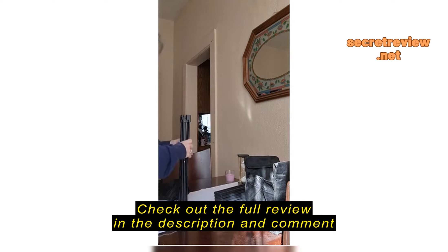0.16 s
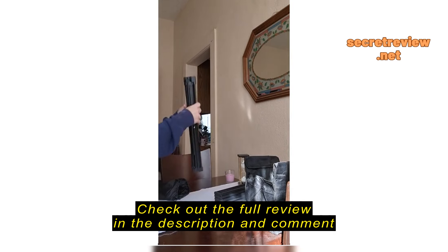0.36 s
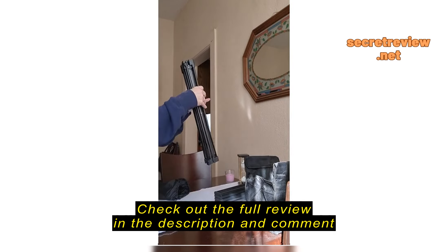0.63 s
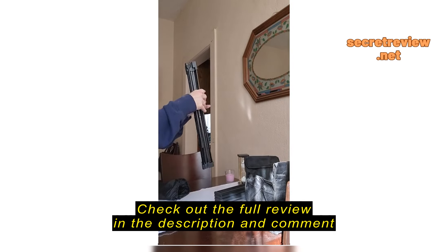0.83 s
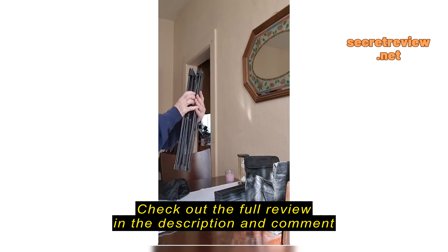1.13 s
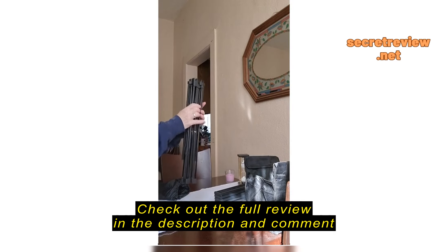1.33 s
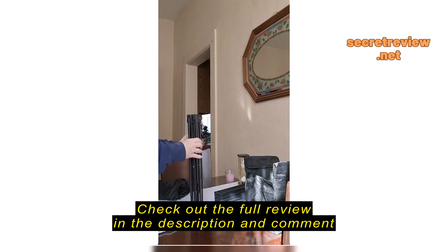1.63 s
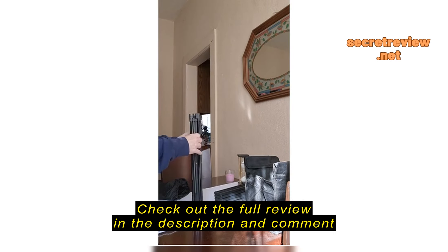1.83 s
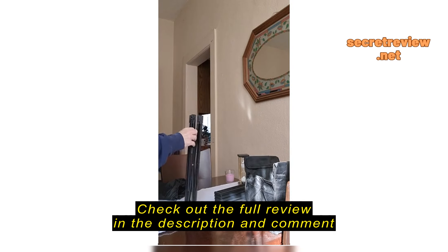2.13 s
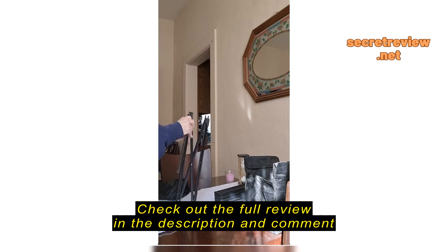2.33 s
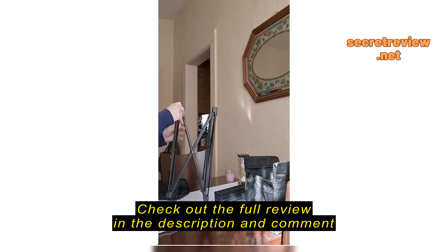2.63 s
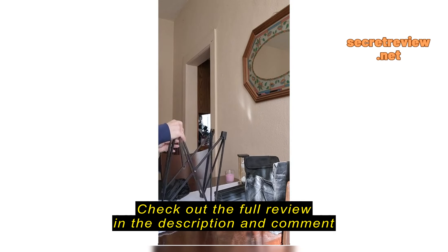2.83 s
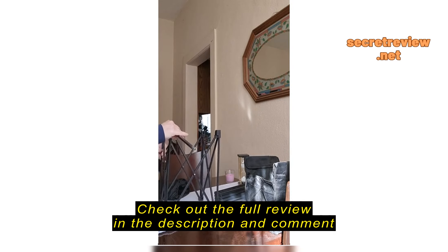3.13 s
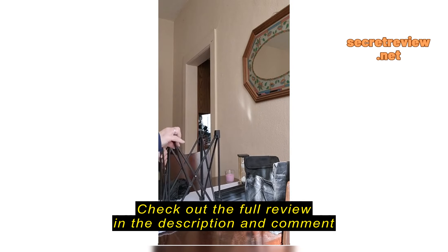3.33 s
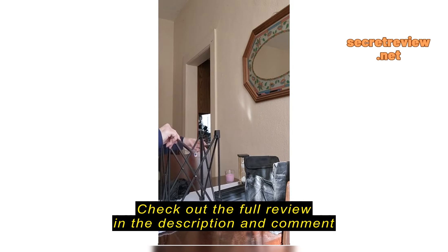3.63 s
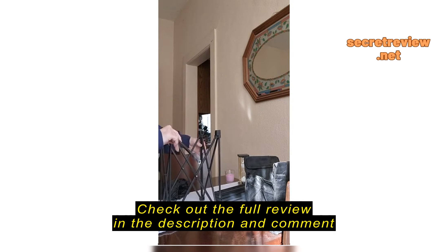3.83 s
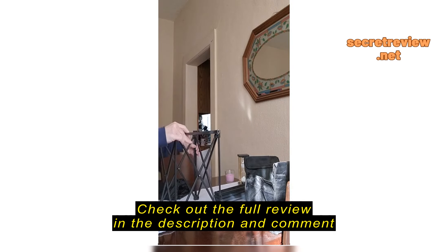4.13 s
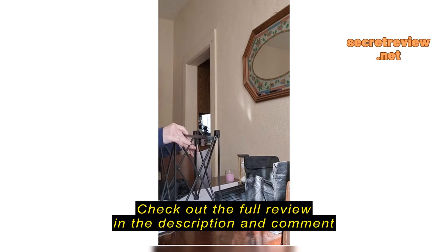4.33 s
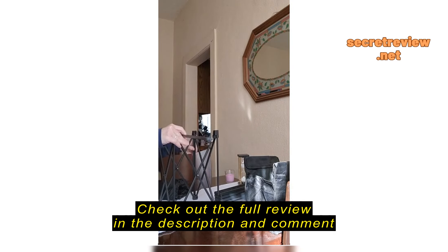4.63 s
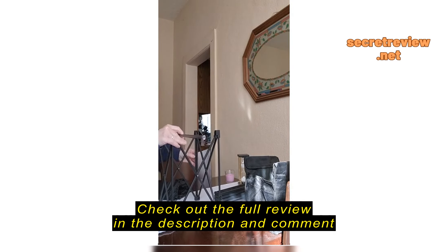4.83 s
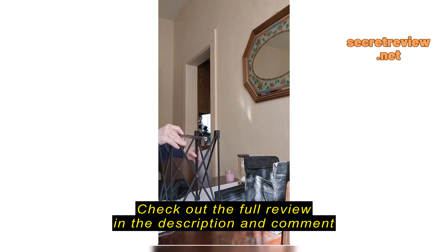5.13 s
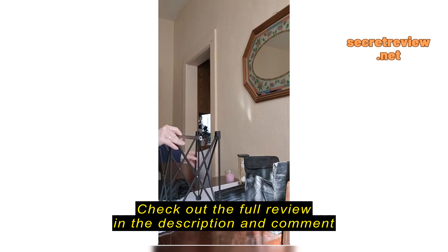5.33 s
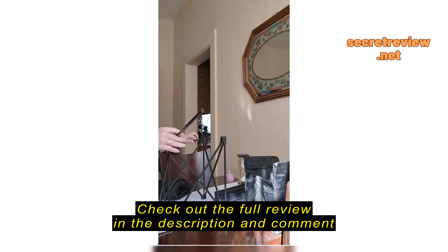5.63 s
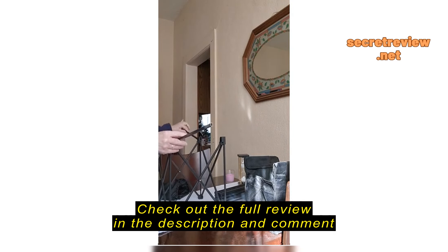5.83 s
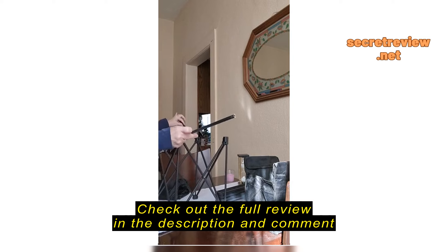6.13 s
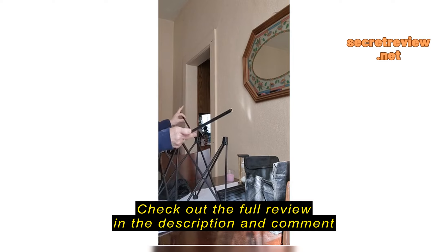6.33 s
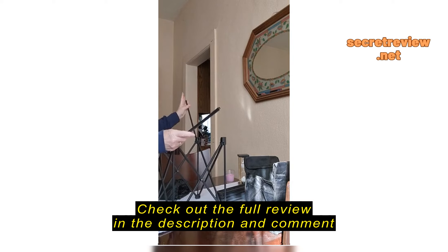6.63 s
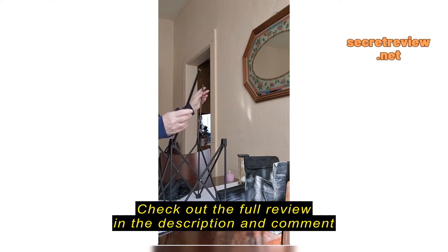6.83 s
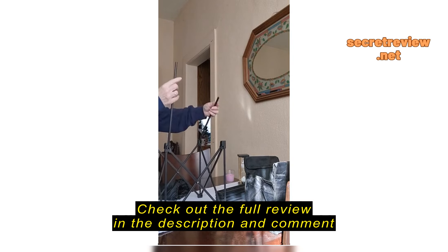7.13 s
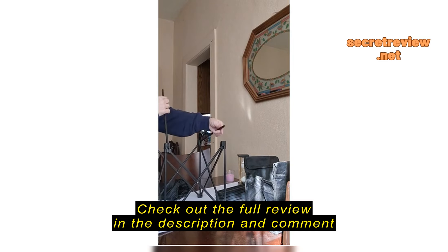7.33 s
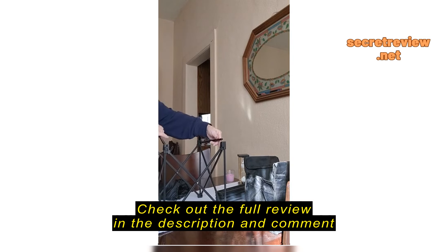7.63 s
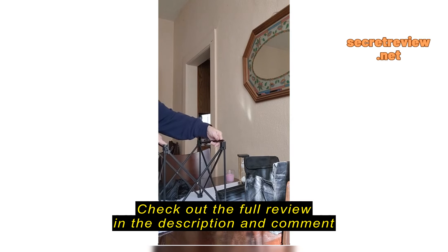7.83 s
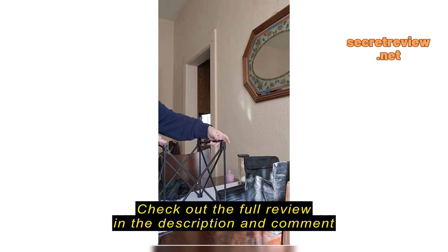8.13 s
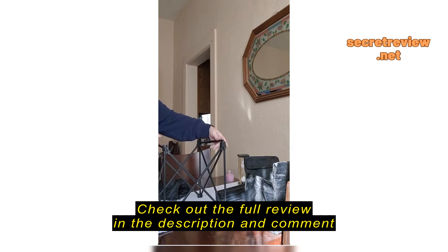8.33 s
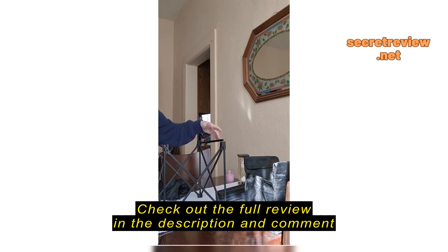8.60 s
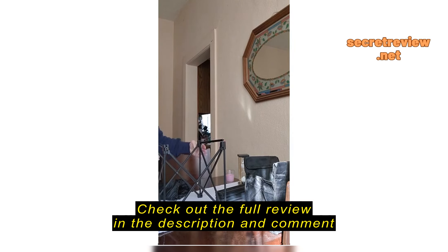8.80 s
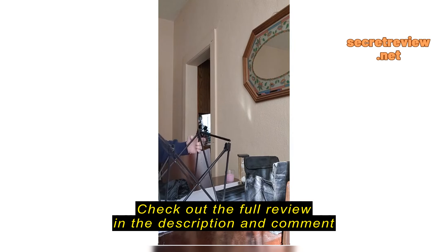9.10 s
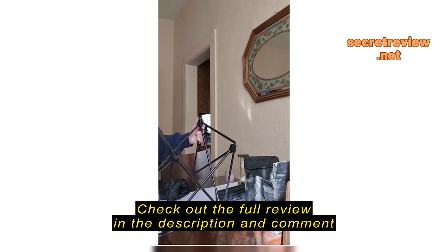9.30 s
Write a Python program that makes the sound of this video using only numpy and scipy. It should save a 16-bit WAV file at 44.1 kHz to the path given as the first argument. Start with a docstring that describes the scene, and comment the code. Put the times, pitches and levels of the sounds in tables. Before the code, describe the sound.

A folding metal frame rattles open close by in a quiet small room, with dull thumps, hard joint cracks, and scattered light pole clinks.

```python
"""A folding camp table is set up on a wooden table in a small room, close to a pair of microphones.
First a sleeve rubs and the bundled legs knock dully in the hand; they clack apart and thump on the wood.
Joints snap home with dry cracks; then the top poles clink, slide and ping to the end over a faint hum.
Blows are bursts of noise coloured by tube resonances; slides are uneven noise; the wood rings in modes."""
import sys
import numpy as np
from scipy import signal
from scipy.fft import rfft, irfft, next_fast_len
from scipy.io import wavfile

SR = 44100
rng = np.random.default_rng(int(sys.argv[2]) if len(sys.argv) > 2 else 0)


def waveform_to_disk(signal):
    """Save audio, clipped to [-1, 1], as 16-bit WAV at the path in sys.argv[1]."""
    frames = np.transpose(np.atleast_2d(signal))
    scaled = np.clip(frames, -1, 1) * 32767
    samples = np.round(scaled).astype(np.int16)
    wavfile.write(sys.argv[1], SR, samples)


N = 417186
TIME = np.arange(N) / SR
HIT_TIME = np.arange(-SR // 16, SR // 3) / SR   # seconds around one contact at zero

# All table levels are relative: each layer has its own gain.
# leg frame clacks: (time [s], level [dB], chatter decay [s], ringing tube [Hz], hardness as treble [dB])
LEG_CLACKS = [(.229, -56, .003, 5500, -21), (0.633, -46.5, 0.0036, 3860, -20), (1.24, -39, .0046, 6640, 4),
              (1.26, -32.5, .016, 6700, -3.5), (1.327, -26.5, .018, 8200, -4),
              (1.346, -29, .0126, 4800, -8.5), (1.388, -36.5, .004, 3800, -3.5),
              (1.454, -43, .039, 5900, -12), (2.167, -34, 0.0025, 4630, -9),
              (2.268, -55.5, 0.022, 7440, -12), (2.29, -24, .006, 7440, 0), (2.353, -38, .01, 4630, -2.5),
              (2.484, -37.5, 0.0059, 3836, -9.5), (2.632, -45.5, .014, 6490, -5),
              (2.794, -51.5, .03, 8000, -10), (2.85, -48.5, .035, 7980, -13),
              (3.035, -36.5, .015, 8000, -12), (3.058, -38.5, 0.01, 8000, 0),
              (3.071, -31.5, 0.0045, 8000, -1.5), (3.323, -41.5, .0066, 5850, -14.5),
              (3.404, -40.5, .008, 6530, -1), (3.529, -40.5, .002, 7620, -4),
              (3.534, -26, .001, 7540, -0.5), (3.988, -32.5, 0.0059, 7950, 6.5),
              (4.534, -23.5, .01, 12900, 1.5)]
# top poles clink: (time [s], level [dB], chatter decay [s])
POLE_CLINKS = [(3.346, -47, 0.006), (3.647, -41.5, 0.02), (3.801, -53.5, 0.0081), (3.865, -49, 0.025),
               (3.898, -47, 0.0045), (3.929, -45.5, 0.015), (4.11, -46, 0.016), (4.2, -48, 0.017),
               (4.349, -43, 0.01), (4.722, -53.5, 0.026), (4.81, -54.5, .014), (4.871, -50, 0.0034),
               (4.899, -44.5, 0.019), (4.984, -45.5, 0.012), (4.999, -40, 0.008), (5.143, -50, 0.016),
               (5.541, -43, 0.015), (5.717, -49.5, 0.041), (5.821, -48.5, .039), (5.865, -50, 0.027),
               (5.934, -49.5, 0.057), (5.981, -44.5, 0.02), (6.011, -43.5, 0.035), (6.2, -47.5, .021),
               (6.292, -42, 0.024), (6.472, -47.5, 0.031), (6.543, -51.5, 0.017), (6.755, -53.5, 0.013),
               (6.885, -54, 0.016), (7.075, -58, 0.01), (7.172, -55, 0.012), (7.246, -48.5, 0.04),
               (7.319, -50.5, 0.029), (7.515, -43.5, 0.015), (7.671, -43.5, 0.0049), (7.742, -42.5, 0.028),
               (8.143, -53, 0.024), (8.769, -56, .07), (8.896, -56.5, 0.057), (8.948, -53, 0.081),
               (9.162, -53, .018), (9.26, -54, .015), (9.417, -47.5, 0.11)]
# a tube slips free of the hand and sings out: (time [s], level [dB], pitch [Hz])
TUBE_PINGS = [(2.794, -64.5, 8000), (3.325, -47.5, 5850), (3.647, -46, 6530), (4.111, -56, 3880),
              (4.199, -56.5, 7500), (4.35, -42.5, 5740), (4.723, -52, 4120), (4.984, -51.5, 4080),
              (7.672, -48.5, 6540), (7.742, -52.5, 6440), (8.948, -63.5, 4030)]
# plastic joints snap home: (time [s], level [dB])
JOINT_SNAPS = [(2.292, -26.5), (3.53, -23), (3.5319, -18), (3.99, -51)]
# dull knocks: the bundled frame in the hand, later its hubs once unfolded: (time [s], level [dB], chatter decay
# [s], body [dB])
DULL_KNOCKS = [(.09, -56, .006, -3), (.179, -56, 0.0044, -3), (.229, -56, 0.0034, -4),
               (.247, -37, 0.0099, 4), (0.543, -53, 0.053, 8.5), (.579, -54, 0.0099, -16),
               (.632, -29.5, 0.01, -6.5), (.663, -46.5, 0.01, 17), (.785, -39, 0.017, -3),
               (.802, -33, 0.015, 4), (0.973, -49.5, 0.021, 5), (2.292, -42.5, 0.005, -15),
               (4.534, -44, .008, 10), (7.815, -54, .015, 1.5), (8.312, -57.5, .005, 10.5)]
# feet land on the wooden table: (time [s], level [dB], contact softness as low-pass corner [Hz])
FOOT_THUMPS = [(.64, -41.5, 120), (0.801, -43, 119), (1.345, -45, 109), (3.036, -26.5, 445),
               (3.064, -27, 427), (4.015, -46, 400), (4.533, -29, 417), (4.55, -29, 177), (5.05, -39, 45),
               (5.818, -43, 70), (7.757, -47.5, 450), (7.805, -47, 350)]
# hands bump softly on the frame: (time [s], level [dB], pitch [Hz])
HAND_BUMPS = [(.52, -46.5, 182.6), (.982, -52.5, 269), (1.341, -49, 152), (1.407, -49, 212),
              (5.001, -48.5, 231), (5.246, -52, 244), (5.436, -46.5, 206), (7.441, -55, 261),
              (9.257, -59.5, 284)]
# long pushes of a tube through its joint: (time [s], length [s], level [dB])
JOINT_PUSHES = [(1.24, 0.21, -50.5), (3.3, .06, -54), (3.89, 0.24, -48.5), (4.45, 0.2, -52),
                (5.2, 0.096, -66), (5.93, 0.15, -53.5), (6.47, 0.073, -57), (6.71, .05, -61),
                (7.0, 0.92, -63.5), (7.76, 0.13, -54.5), (8.06, 0.049, -64.5), (8.16, 0.13, -56),
                (8.39, 0.14, -64)]
# sleeve and hand rub on the bundle, level curve: (time [s], level [dB])
SLEEVE_RUB = [(0.0, -57.5), (0.236, -49.5), (0.364, -61.5), (0.592, -70), (0.73, -62), (0.838, -56),
              (1.024, -73), (1.15, -78)]

# resonances of the tubes: (frequency [Hz], width [Hz], level [dB])
LEG_RESONANCES = [(960, 30, 2.5), (1994, 220, -21), (2430, 79, 0.5), (3540, 44, -3), (3860, 72, -3.5),
                  (4047, 130, 1.5), (5460, 110, -9.5), (5880, 250, -6.5), (8130, 100, -20.5),
                  (13200, 250, -8), (15800, 450, -2.5)]
POLE_RESONANCES = [(2160, 150, -10), (4083, 150, -6), (5550, 100, -6.5), (6490, 89, 6), (8070, 130, 0.5),
                   (9500, 110, 3.5), (12570, 85, 13.5)]
BUNDLE_RESONANCES = [(367, 80, -13), (860, 110, -15.5), (1264, 20, -22), (1470, 89, 5), (1613, 73, 0),
                     (1930, 230, 4.5)]
# ringing of the wooden table: (frequency [Hz], level [dB], decay by 60 dB [s])
WOOD_MODES = [(45, -12.5, 1), (72, -30, .15), (114, 3, 0.35), (197.2, -7.5, 0.475), (231, -26, 0.34),
              (274.2, -6.5, 0.32), (395, -15, .2), (526, -21, 0.34)]

# colour of the contacts on legs, poles and bundle: (frequency [Hz], level [dB])
LEG_SPECTRUM = [(150, -17.5), (500, -11), (1000, -13.5), (2000, -4), (2850, -7.5), (4000, -3), (7900, -3.5),
                (9000, -8), (13000, -3.5), (15500, -11)]
POLE_SPECTRUM = [(150, -10), (500, 1.5), (1200, -7.5), (2100, -1.5), (2800, -4.5), (4000, 2), (7500, -2.5),
                 (9000, -8.5), (11000, -16.5), (13000, -16), (15500, -18)]
BUNDLE_SPECTRUM = [(40, -19.5), (130, -3.5), (250, 0), (420, -3.5), (550, -1), (800, -0.5), (2000, -7),
                   (2800, -8), (4200, -6), (8000, -16), (10000, -27.5), (15500, -29.5)]
# skin patting the tubes: (frequency [Hz], level [dB])
PAT_SPECTRUM = [(80, -6.5), (250, 4), (600, -10.5), (1500, -19.5), (4000, -54)]
# room noise: (frequency [Hz], level [dB])
AIR_SPECTRUM = [(12, -31), (20, 8), (120, -0.5), (239, -8.5), (341, -5.5), (584, -9.5), (1290, -18.5),
                (2100, -20), (2920, -25.5), (4070, -25), (5130, -35), (6460, -31), (8130, -30.5),
                (9000, -44.5), (11700, -53.5), (19800, -120)]

# sideways share of the sound field at the two microphones: (frequency [Hz], level [dB])
SIDE_SHARE = [(60, -14.5), (200, -16.5), (320, -16.5), (500, -10), (900, -0.5), (16000, 1)]
# reverberation of the small room: (frequency [Hz], decay by 60 dB [s])
ROOM_DECAY = [(150, 0.94), (500, 0.46), (1400, 0.3), (4000, 0.25), (9000, 0.2), (15000, 0.17)]
# left microphone's response over the right one's: (frequency [Hz], level [dB])
LEFT_OVER_RIGHT = [(380, 0), (700, -2.5), (1300, -3), (2400, 0), (4400, -2), (8100, 7.5), (11000, -0.5),
                   (15000, -0.5)]

CUTOFF_HZ = 16000   # top of the microphones' range
CLACK_S = 0.0079   # usual chatter of a blow
BODY_DB_PER_DOUBLING = 2.5   # body a clack gains with each doubling of its chatter
CLINK_DB, BRIGHTENING_DB_PER_DB = -50, .3   # usual strength; treble gained with strength
HELD_UNTIL_S, HELD_TREBLE_DB = 4.5, -3.5   # until then a hand is closed round the poles and dulls them
PING_T60_S = 0.071
BUNDLE_RING_HZ, GRIP_T60_S = 912, .07   # the gripping hand damps the bundle's ring
PALM_LAG_S, PALM_DB = .021, 1.5   # the palm lands just after the fingers
# a push starts fast, slackens as it goes and trails off
PUSH_RISE_DB_PER_S, PUSH_SAG_DB_PER_S, PUSH_FALL_DB_PER_S = 452, 17.5, 131.5
SHIFT_DB, SHIFT_S = -14.5, 0.055   # the pole shifts in its seat after a clink: level against it, length
FIRST_TOUCH_DB, FIRST_TOUCH_S = -0.5, 0.001   # first collision of a blow: level over the chatter, decay
RATTLE_DB, RATTLE_S = 1.5, 0.0033   # later collisions come in uneven bunches: spread, bunch length
AIR_DB, HUM_HZ, HUM_DB = -63.5, 120, -69.5


def legs():
    """Leg tubes and their plastic hubs clack together; the longer the chatter, the more body."""
    blows = []
    for s, db, chatter, ring_hz, treble in LEG_CLACKS:
        body = BODY_DB_PER_DOUBLING * np.log2(chatter / CLACK_S)
        blows.append((s, db, chatter, ring_hz, body, treble))
    hits = strikes(blows, LEG_RESONANCES, LEG_SPECTRUM, edges=(2000, 3000, 8000, 10000),
                   partial_count=100, body_db=-3.5, top_db=-1.0, grain_db=1.0, resonance_db=-3.0,
                   tone_db=-13.5, tone_t60=0.085, lead_db=-6.5, lead_step_db=2.5, swell=0.0096)
    return from_db(25.0) * room(hits, wet_db=0.5, build_s=0.0029)


def poles():
    """Poles clink a little to the left, each time on a random mode; hard or free clinks are brighter."""
    picks = rng.integers(len(POLE_RESONANCES), size=len(POLE_CLINKS))
    blows = []
    for (s, db, chatter), pick in zip(POLE_CLINKS, picks):
        treble = BRIGHTENING_DB_PER_DB * (db - CLINK_DB) + HELD_TREBLE_DB * (s < HELD_UNTIL_S)
        blows.append((s, db, chatter, POLE_RESONANCES[pick][0], 0, treble))
    hits = strikes(blows, POLE_RESONANCES, POLE_SPECTRUM, edges=(2000, 3110, 8000, 10500),
                   partial_count=110, body_db=-2, top_db=7.5, grain_db=6.5, resonance_db=4.5,
                   tone_db=-17.5, tone_t60=.13, lead_db=-6.5, lead_step_db=0.5, swell=0.012)
    for s, db, hz in TUBE_PINGS:
        add(hits, from_db(db) * beating(hz, PING_T60_S), s)
    return from_db([[24.5], [23.5]]) * room(hits, wet_db=1, build_s=0.0022)


def joints():
    """A joint snapping home gives a short, hard crack straight at the microphones, with little room."""
    out = np.zeros((2, N))
    crack_spectrum = [(1000, -27.5), (2500, -13.5), (4500, 7), (8000, 4), (11000, 2.5), (15500, 6)]
    for s, db in JOINT_SNAPS:
        crack = contact(lead_db=-38.5, swell=.001, chatter=0.0018, grain_db=-2.5)
        add(out, from_db(db) * unit(colour(crack, crack_spectrum)), s)
    return from_db([[23], [21]]) * room(out, wet_db=-14, build_s=.003)


def bundle():
    """Dull knocks: first the frame held tight in the hand, later its hubs bumping once unfolded."""
    blows = [(s, db, chatter, BUNDLE_RING_HZ, body, 0) for s, db, chatter, body in DULL_KNOCKS]
    hits = strikes(blows, BUNDLE_RESONANCES, BUNDLE_SPECTRUM, edges=(1080, 1540, 3430, 4800),
                   partial_count=150, body_db=1.2, top_db=-6, grain_db=1.5, resonance_db=4.5,
                   tone_db=-12.5, tone_t60=GRIP_T60_S, lead_db=-22, lead_step_db=6, swell=0.029)
    return from_db(26.0) * room(hits, wet_db=-1.5, build_s=0.00074)


def table():
    """The wooden top booms under the feet; a soft contact weakens its higher modes."""
    out = np.zeros((2, N))
    push_spectrum = [(25, 8.5), (70, 8.0), (150, 6.0), (330, -2), (550, -7.5), (900, -14.5), (2500, -46.5)]
    for s, db, soft_hz in FOOT_THUMPS:
        shove = contact(lead_db=5.5, swell=0.004, chatter=0.061, grain_db=-6)
        push = unit(colour(shove, push_spectrum))
        boom = ring(WOOD_MODES) + from_db(-5.0) * push
        softness = signal.butter(1, soft_hz, fs=SR, output="sos")
        add(out, from_db(db) * signal.sosfilt(softness, boom), s)
    return from_db(27) * out


def hands():
    """Fingers, then palm: each a soft, quickly damped thud with a pat of skin."""
    out = np.zeros((2, N))
    cushion = 1 - np.exp(-(np.maximum(HIT_TIME, 0) / .004) ** 2)   # flesh softens the onset
    for s, db, hz in HAND_BUMPS:
        for lag, touch_db in ((0, 0), (PALM_LAG_S, PALM_DB)):
            thud = unit(cushion * ring([(hz, 0, .045), (hz * 1.42, -5, .04), (hz * 3.05, -14, .04)]))
            skin = contact(lead_db=-29, swell=0.0033, chatter=0.017, grain_db=-1.0)
            pat = unit(colour(skin, PAT_SPECTRUM))
            add(out, from_db(db + touch_db) * (thud + from_db(-5.5) * pat), s + lag)
    return from_db(24.5) * room(out, wet_db=-10, build_s=.01)


def sliding():
    """Tubes scrape in their joints, in long pushes and after each clink, and set the poles singing."""
    shifts = [(s, SHIFT_S, db + SHIFT_DB) for s, db, _ in POLE_CLINKS]
    level_db = effort(JOINT_PUSHES + shifts)
    rubbing = friction(level_db, POLE_SPECTRUM, grain_db=2.0, slips_per_s=400)
    scrape = resonate(rubbing, POLE_RESONANCES, resonance_db=-1.5)
    return from_db(-5.5) * room(scrape, wet_db=-3.0, build_s=0.0019)


def sleeve():
    """Cloth and fingers rub on the bundle while it is lifted: uneven noise under a level curve."""
    level_db = np.interp(TIME, *np.transpose(SLEEVE_RUB), right=-120)
    return from_db(-3.5) * friction(level_db, BUNDLE_SPECTRUM, grain_db=4.0, slips_per_s=110)


def background():
    """Soft room noise with little treble, an appliance's wavering hum and a very faint hiss."""
    low_pass = signal.butter(10, 8600, fs=SR, output="sos")
    air = signal.sosfilt(low_pass, colour(stereo_noise(N), AIR_SPECTRUM))
    waver = signal.resample(rng.standard_normal(size=60), N)   # slow random phase
    hum = np.sqrt(2) * np.sin(2 * np.pi * HUM_HZ * TIME + 0.37 * waver)
    hiss = from_db(-97.5) * stereo_noise(N)
    return from_db(AIR_DB) * np.sqrt(N) * unit(air) + from_db(HUM_DB) * hum + hiss


def strikes(events, modes, spectrum, edges, partial_count, body_db, top_db, grain_db, resonance_db,
            tone_db, tone_t60, lead_db, lead_step_db, swell):
    """Each blow is a burst of contacts through the tubes, tilted by its hardness; one tube rings on."""
    out = np.zeros((2, N))
    for s, db, chatter, ring_hz, body, top in events:
        # a loose, chattering blow scrapes more on its way in
        scrape_db = lead_db + lead_step_db * np.log2(chatter / CLACK_S)
        burst = contact(scrape_db, swell, chatter, grain_db) * jolts()
        burst = colour(burst, spot(CUTOFF_HZ / partial_count))
        burst = resonate(colour(burst, spectrum), modes, resonance_db)
        tilt = list(zip(edges, [body + body_db, 0, 0, top + top_db]))
        blow = colour(unit(burst), tilt)
        tone = from_db(tone_db) * beating(ring_hz, tone_t60)
        add(out, from_db(db) * (blow + tone), s)
    return out


def contact(lead_db, swell, chatter, grain_db):
    """A soft scrape leads up to the blow; then a crowd of tiny collisions dies away."""
    before = HIT_TIME < 0
    fade_s = np.maximum(np.where(before, swell, chatter), 1e-4)
    shape = np.where(before, from_db(lead_db), 1) * np.exp(-np.abs(HIT_TIME) / fade_s)
    # each collision size holds for 16 samples
    sizes = from_db(grain_db * np.clip(rng.standard_normal(len(shape) // 16 + 1), -2, 2))
    return stereo_noise(len(shape)) * shape * np.repeat(sizes, 16)[:len(shape)]


def jolts():
    """Gain over one blow: a hard first touch, then an uneven rattle."""
    bunch = (np.maximum(HIT_TIME, 0) / RATTLE_S).astype(int)
    sizes = from_db(RATTLE_DB * np.clip(rng.standard_normal(size=400), -2, 2))
    touch = from_db(FIRST_TOUCH_DB) * np.exp(-np.abs(HIT_TIME) / FIRST_TOUCH_S) * (HIT_TIME >= 0)
    return np.where(bunch > 0, sizes[bunch], 1) + touch


def spot(spacing_hz):
    """The touching spot decides which short partials stand out, most in the treble: (Hz, dB)."""
    hz = np.arange(spacing_hz, CUTOFF_HZ, spacing_hz)
    depth_db = at_hz([(500, 3), (3000, 5)], hz)
    return np.transpose([hz, depth_db * np.minimum(rng.exponential(size=len(hz)), 2.5)])


def resonate(x, modes, resonance_db):
    """Contact noise plus what the tubes make of it at their resonances."""
    peaks = 0
    for hz, width, db in modes:
        peaks = peaks + from_db(db) * signal.lfilter(*signal.iirpeak(hz, hz / width, fs=SR), x)
    return x + from_db(resonance_db) * peaks


def beating(hz, t60):
    """A tube that is not quite round splits its mode into beating neighbours."""
    return ring([(hz * split, 0, t60) for split in (.988, .996, 1.003, 1.012)])


def ring(modes):
    """Decaying modes (Hz, dB, t60 in s), struck with slightly different strength and pitch every time."""
    t, out = np.maximum(HIT_TIME, 0), 0
    for hz, db, t60 in modes:
        pitch = hz * (1 + .003 * rng.standard_normal())
        level = db + rng.standard_normal()
        phase = rng.standard_normal((2, 1)) * from_db(at_hz(SIDE_SHARE, hz))   # differs by microphone
        out = out + from_db(level - 60 * t / t60) * np.sin(2 * np.pi * pitch * t + phase)
    return unit(out * (HIT_TIME >= 0))


def friction(level_db, spectrum, grain_db, slips_per_s):
    """Uneven slips under a changing level."""
    knots = np.cumsum(rng.exponential(1 / slips_per_s, size=20000))   # random times of the slips
    sizes_db = grain_db * np.clip(rng.standard_normal(len(knots)), -2, 2)
    slips = from_db(np.interp(TIME, knots, sizes_db))
    return np.sqrt(N) * unit(colour(stereo_noise(N) * slips, spectrum)) * from_db(level_db)


def effort(pushes):
    """Level in dB of the strongest push under way: each starts quickly, slackens and trails off."""
    t = TIME[::64]
    s, length, db = np.transpose(pushes)[..., None]
    early = np.maximum(s - t, 0)
    since = np.maximum(t - s, 0)
    late = np.maximum(t - s - length, 0)
    levels = db - PUSH_RISE_DB_PER_S * early - PUSH_SAG_DB_PER_S * since - PUSH_FALL_DB_PER_S * late
    return np.interp(TIME, t, levels.max(axis=0))


def room(x, wet_db, build_s):
    """Direct sound plus reflections that thicken quickly and die sooner in the treble."""
    t = np.arange(SR * 2 // 3) / SR
    noise, tail = rfft(stereo_noise(len(t))), 0
    hz = np.arange(noise.shape[-1]) * SR / len(t)
    for centre, t60 in ROOM_DECAY:
        band = at_hz([(f, f == centre) for f, _ in ROOM_DECAY], hz)   # overlapping triangle
        tail = tail + irfft(noise * band, len(t)) * from_db(-60 * t / t60)
    tail = unit(tail * (1 - np.exp(-t / build_s)))
    return x + from_db(wet_db) * signal.fftconvolve(x, tail, axes=-1)[:, :N]


def stereo_noise(size):
    """Diffuse noise, alike in both channels in the bass only."""
    mid, side = rng.standard_normal((2, size))
    return mid + colour(side, SIDE_SHARE) * [[1], [-1]]


def colour(x, spectrum):
    """Causal (minimum-phase) filter with the given dB spectrum, built by folding its cepstrum."""
    size = 2 * next_fast_len(x.shape[-1] // 2 + 1)
    hz = np.arange(size // 2 + 1) * SR / size
    cepstrum = irfft(np.log(from_db(at_hz(spectrum, hz))))
    cepstrum[1:size // 2] *= 2
    cepstrum[size // 2 + 1:] = 0
    return irfft(rfft(x, size) * np.exp(rfft(cepstrum)))[..., :x.shape[-1]]


def at_hz(points, hz):
    """Read a table on a log-frequency axis."""
    f, value = np.transpose(points)
    return np.interp(np.log(np.maximum(hz, 1)), np.log(f), value)


def from_db(db):
    """Amplitude factor of a level in dB."""
    return 10 ** (np.asarray(db) / 20)


def unit(x):
    """Scale to an energy of one per channel."""
    return x / np.sqrt(np.mean(np.sum(x ** 2, axis=-1)) + 1e-20)


def add(out, sound, s):
    """Mix in a hit whose contact falls at time s."""
    start = round((s + HIT_TIME[0]) * SR)
    part = sound[..., :N - start]
    out[:, start:start + part.shape[-1]] += part


def scene():
    """Frame, poles, joints and table top close by, hands and sleeve on them, and the quiet room."""
    frame = legs() + poles() + joints() + bundle()
    return frame + table() + hands() + sliding() + sleeve() + background()


def record(dry):
    """The two microphones differ in colour; the top is cut steeply."""
    heard = []
    for x, share in zip(dry, (.5, -.5)):   # each takes half of the balance
        heard.append(colour(x, [(hz, share * db) for hz, db in LEFT_OVER_RIGHT]))
    return signal.sosfilt(signal.ellip(12, .1, 80, CUTOFF_HZ, fs=SR, output="sos"), heard)


dry = scene()
out = record(dry)
waveform_to_disk(out)
```